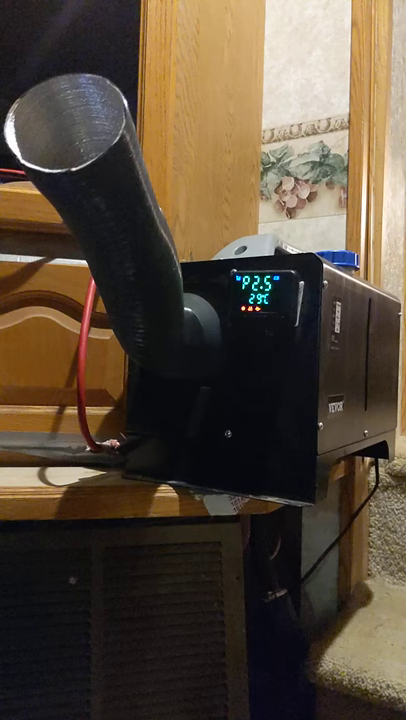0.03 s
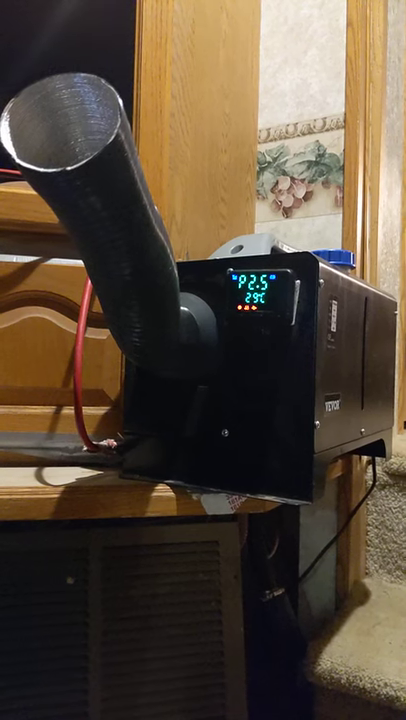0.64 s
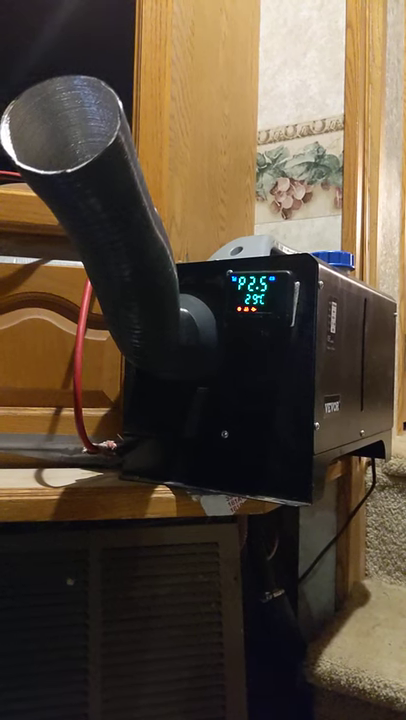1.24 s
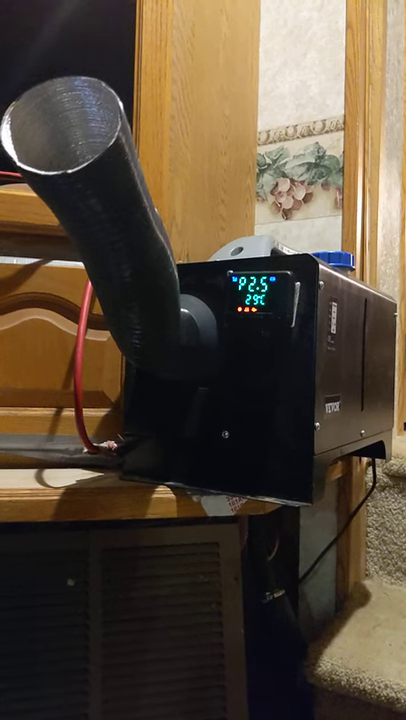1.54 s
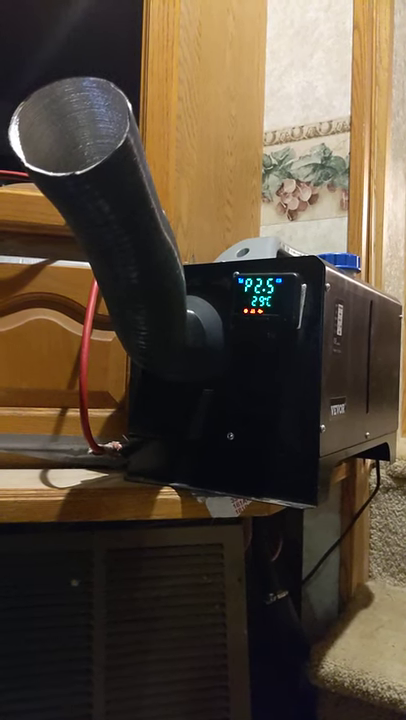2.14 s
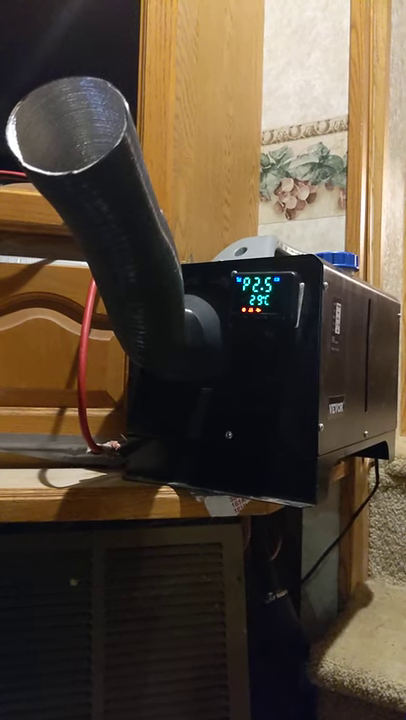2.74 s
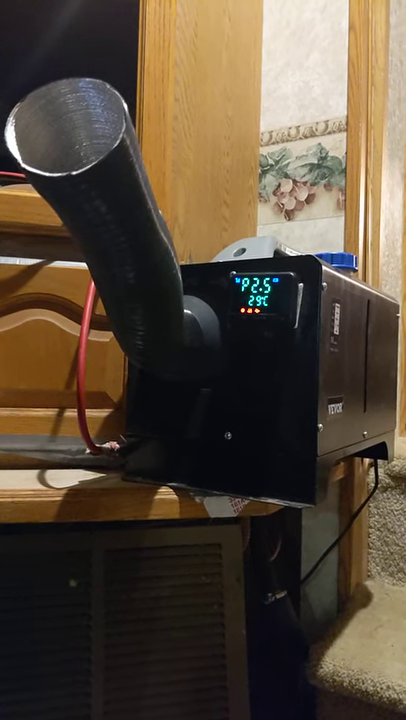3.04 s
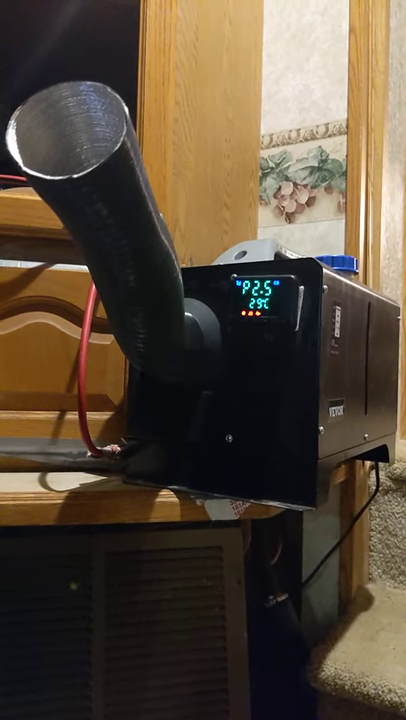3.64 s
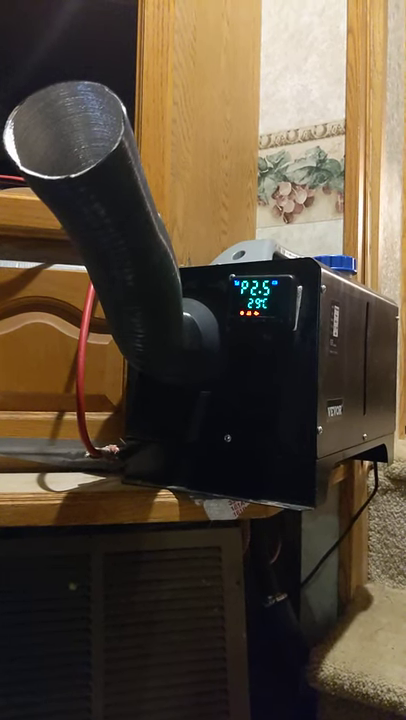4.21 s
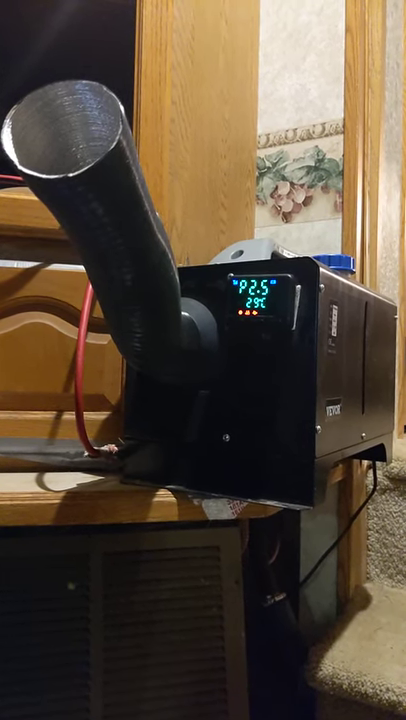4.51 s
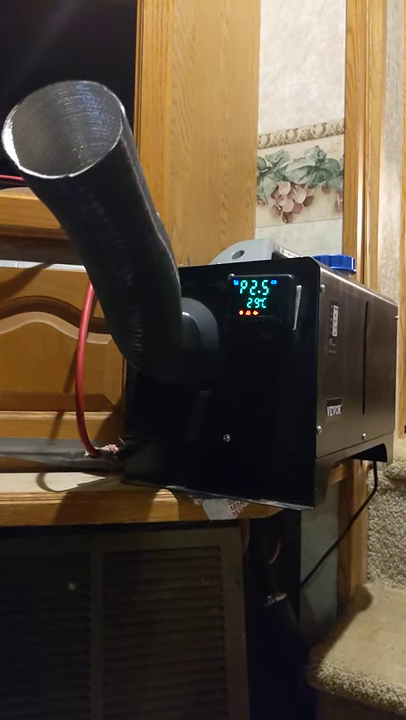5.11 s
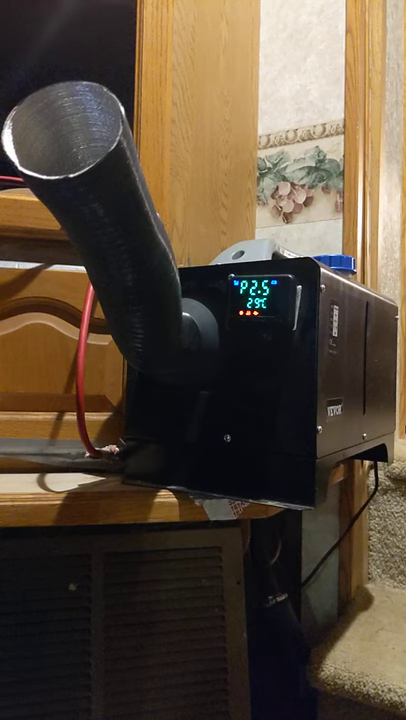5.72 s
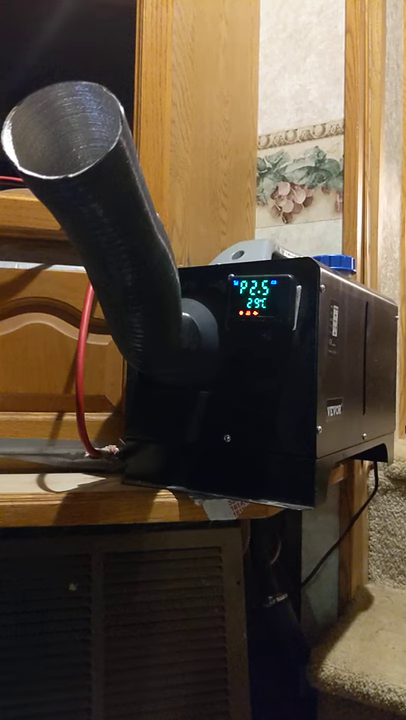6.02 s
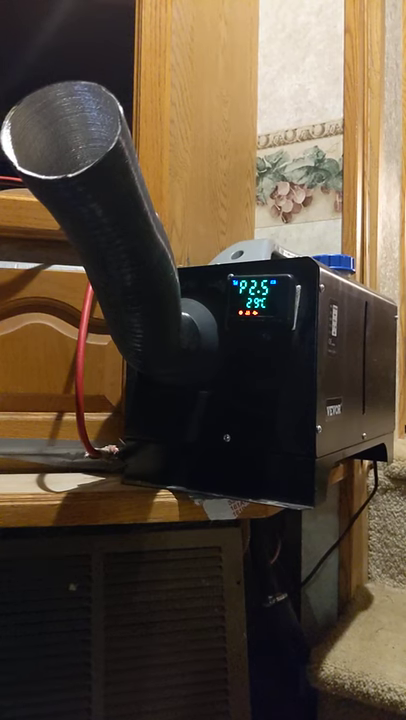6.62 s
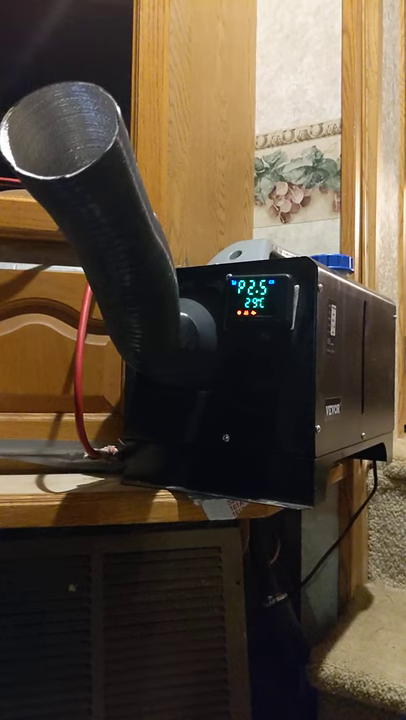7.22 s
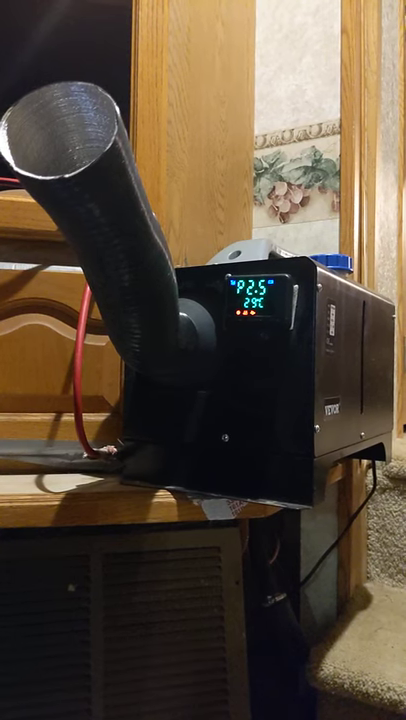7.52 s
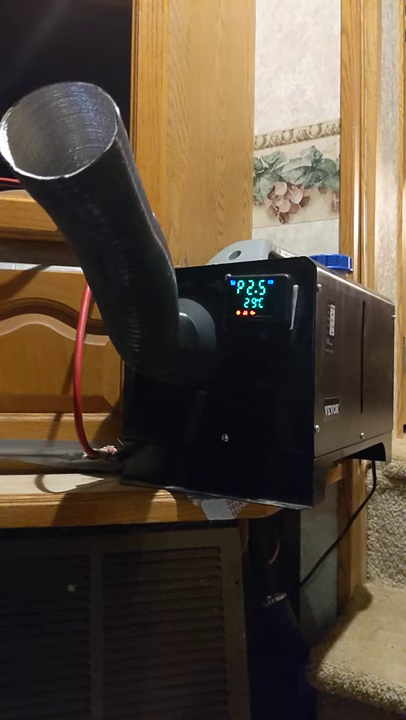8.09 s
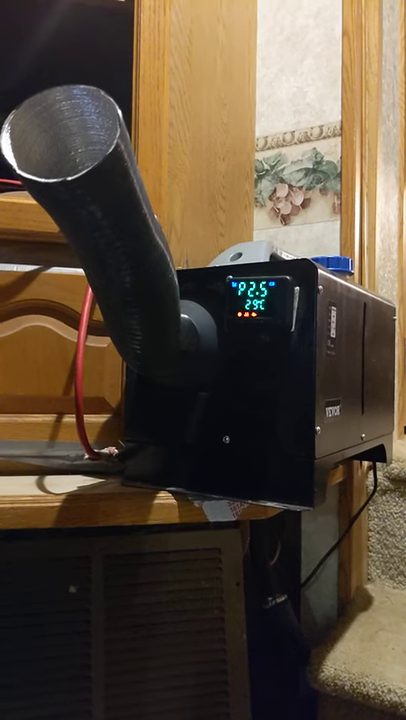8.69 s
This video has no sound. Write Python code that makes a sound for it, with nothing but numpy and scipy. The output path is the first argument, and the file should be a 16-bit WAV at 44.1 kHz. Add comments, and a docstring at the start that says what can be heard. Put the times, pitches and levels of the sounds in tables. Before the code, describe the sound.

Heard from close by in a small room, a heater's fuel pump knocks and clicks back in an even rhythm, roughly two pairs a second. Underneath, the burner's low rumble pulses with the pump, joined by a constant rush of air and an even fan hum. Now and then the flame gives a brief, soft thump, while the running stays otherwise unchanged.

```python
"""A low rumble and a rush of air: a diesel heater running on a shelf in a small wood-panelled room.
Its fan blows through a duct and hums on multiples of the shaft speed. One microphone stands in the
room, near enough to catch the fuel pump's plunger knocking in and clicking back about twice a second.
The burner's rumble surges with each stroke, and now and then the flame thumps."""
import sys
import numpy as np
from scipy.fft import rfft, irfft, next_fast_len
from scipy.io import wavfile
from scipy.ndimage import uniform_filter1d, map_coordinates

SR = 44100
rng = np.random.default_rng(int(sys.argv[2]) if len(sys.argv) > 2 else 0)


def store_wav(level_fs):
    """Save 16-bit WAV to argv[1]."""
    pcm = np.round(np.clip(np.atleast_2d(level_fs), -1, 1) * 32767)
    wavfile.write(sys.argv[1], SR, pcm.T.astype(np.int16))


N = 385875
FIRST_STROKE_S, STROKE_PERIOD_S = 0.6258, 0.4605  # the pump's beat, which the burner follows


def amp(db):
    return 10 ** (np.asarray(db) / 20)


def along(points, hz):
    """Read (Hz, value) points on a log frequency axis."""
    point_hz, values = np.transpose(points)
    return np.interp(np.log(hz + 1), np.log(point_hz + 1), values)


def curve(rows):
    """Join (seconds, value) rows into one value per sample."""
    return np.interp(np.arange(N) / SR, *np.transpose(rows))


def wobble(rate):
    """A smooth random curve with `rate` knots a second."""
    knots = rng.standard_normal(int(N * rate / SR) + 4)
    return map_coordinates(knots, [np.arange(N) * rate / SR])


def noise(gain, size):
    """Noise of rms 1, coloured by a gain over frequency."""
    padded = next_fast_len(size)
    spectrum = rfft(rng.standard_normal(padded)) * gain(np.fft.rfftfreq(padded, 1 / SR))
    coloured = irfft(spectrum, padded)[:size]
    return coloured / np.sqrt(np.mean(coloured ** 2) + 1e-20)


def add(track, start_s, sound):
    part = track[round(start_s * SR):][:len(sound)]
    part += sound[:len(part)]


# Broad spectrum of burner and air stream. Each row: frequency in Hz, relative level in dB.
FLOW_SPECTRUM = [(25, -37.5), (42, -28), (60, -7.5), (150, 1.5), (215, -10), (350, -7.5), (520, -22.5),
                 (850, -28.5), (1500, -32), (3000, -35.5), (4500, -47.5), (8000, -57), (14000, -52)]
# Resonances and cancellations of duct, case and room. Each row: centre in Hz, width in Hz, gain in dB.
DUCT_RESONANCES = [(66.8, 13, 7.5), (97, 8.4, -10.5), (191, 7.6, -8), (236, 11.2, 5), (296, 10.8, 3.5),
                   (378.4, 3.7, -5.5), (594.5, 50, 9), (636, 8.9, -10), (845, 65, 7.5), (1014, 9.7, -2.5),
                   (1037, 9, 4.5), (1120, 22, -3.5), (1173, 9.2, 5), (1257, 63, 9), (1340, 26, 9),
                   (1560, 21, 2.5), (1832, 8.5, 8.5), (2030, 93, -5.5), (2266, 7.9, 9.5), (2685, 25, -6.5),
                   (2800, 52, 2), (3380, 52, -8.5), (3520, 48, 3), (6170, 42, 1), (6800, 39, 7),
                   (8700, 280, 2.5), (10050, 160, -3.5), (11900, 114, 8), (12420, 80, 3), (12650, 100, 4.5),
                   (13600, 210, -8)]

def duct(hz):
    """Duct, case and room colour the flow on its way to the microphone."""
    resonance_db = sum(db * np.exp(-0.5 * ((hz - centre) / width) ** 2)
                       for centre, width, db in DUCT_RESONANCES)
    return amp(along(FLOW_SPECTRUM, hz) + resonance_db)


# The flame's rumble between pump strokes. Each row: time in seconds, relative level in dB.
FLAME_LEVELS = [(0.53, -43.5), (1.36, -47.5), (1.48, -45), (2.32, -46.5), (2.44, -42.5), (2.67, -48.5),
                (2.91, -43.5), (3.15, -46.5), (3.51, -44), (4.22, -45.7), (4.46, -48), (4.58, -44),
                (6.01, -45), (6.25, -43.1), (6.49, -47), (7.08, -42.3), (7.2, -47), (8.75, -44.1)]

def burner(gain_db=-0.5, edge_hz=195, flicker_db=0.88, surge_db=5.5, rise_s=0.013, fall_s=0.11):
    """The flame rumbles in the lowest resonances, surges after each pump stroke and flickers."""
    roar = noise(lambda hz: duct(hz) / np.sqrt(1 + (hz / edge_hz) ** 20), size=N)
    even_roar = roar / np.sqrt(np.abs(uniform_filter1d(roar ** 2, size=SR // 6)))
    since_stroke = (np.arange(N) / SR - FIRST_STROKE_S) % STROKE_PERIOD_S
    surge = (1 - np.exp(-(since_stroke / rise_s) ** 2)) * np.exp(-since_stroke / fall_s)
    level_db = curve(FLAME_LEVELS) + gain_db + surge_db * surge + flicker_db * wobble(rate=14)
    return amp(level_db) * even_roar


def air(level_db=-46.5, edge_hz=195, flutter_db=0.5):
    """Air blown into the room rushes above the rumble, fluttering a little."""
    stream = noise(lambda hz: duct(hz) / np.sqrt(1 + (edge_hz / (hz + 1)) ** 20), size=N)
    return amp(level_db + flutter_db * wobble(rate=12)) * stream


# The fan motor. Each row: time in seconds, speed in turns per second.
SHAFT_SPEED = [(0.7, 40.66), (2.2, 40.67), (2.9, 40.79), (4.2, 40.86), (5.0, 40.79), (5.9, 40.7),
               (7.2, 40.74), (7.9, 40.78), (8.45, 40.88)]
# The fan's hum. Each row: multiple of the shaft speed, relative level in dB.
FAN_ORDERS = [(19, -81.5), (20, -63.3), (21, -60.5), (22, -77.5), (23, -80), (24, -84), (26, -81.5),
              (31, -78.5), (32, -69.3), (33, -70), (34, -78.6), (38, -84), (45, -86), (55, -87)]

def fan(gain_db=4):
    """Neighbouring shaft orders beat once a turn; turbulence makes each waver slightly."""
    shaft_angle = 2 * np.pi * np.cumsum(curve(SHAFT_SPEED)) / SR
    hum = np.zeros(N)
    for order, db in FAN_ORDERS:
        phase = order * shaft_angle + rng.uniform(0, 2 * np.pi) + 0.06 * wobble(rate=14)
        hum += amp(db + 0.42 * wobble(rate=7)) * np.sqrt(2) * np.sin(phase)
    return amp(gain_db) * hum


def ticks(t, count, spectrum, attack_s, t60, room_t60, alike, room_db=-11):
    """Metal ticks with a short room tail; the share `alike` of their power is the same each time."""
    def dense_ring():
        return noise(lambda hz: amp(along(spectrum, hz)), size=len(t))
    decay = np.hypot(amp(-60 * t / t60), amp(room_db - 60 * t / room_t60))
    envelope = (1 - np.exp(-t / attack_s)) * decay
    common = np.sqrt(alike) * dense_ring()
    return [envelope * (common + np.sqrt(1 - alike) * dense_ring()) for _ in range(count)]


def ringing(t, modes, rise_s, scatter_db):
    """A body takes up a blow over the rise time and rings, each mode at a new strength."""
    ring = sum(amp(db + scatter_db * rng.standard_normal() - 60 * t / t60) * np.sin(2 * np.pi * hz * t)
               for hz, db, t60 in modes)
    return ring * (1 - np.exp(-(t / rise_s) ** 2))


# The plunger hitting its front and back stops. Each row: frequency in Hz, relative level in dB.
FRONT_STOP = [(300, -23), (900, -8), (2200, 1), (3300, 6), (4500, -3), (6200, 0.5), (8000, -5), (10000, -9),
              (14000, -11)]
BACK_STOP = [(300, -20), (900, -2), (2200, 3), (3300, -5), (4500, 4.5), (6200, 8), (8000, 0.5),
             (10000, -2.5), (14000, -4)]
# Modes of the pump's steel body, then of its bracket and the heater case.
# Each row: frequency in Hz, relative level in dB, seconds to fall by 60 dB.
STEEL_MODES = [(3103, 8, 0.048), (3520, 3.5, .07), (3980, -4, 0.084), (4040, -2, 0.12), (4360, -5, 0.09),
               (5330, 2, 0.06), (5490, -11, .08), (6140, 2.5, 0.07), (6800, 0, 0.091), (7140, -0.5, 0.049),
               (7800, -5, .06), (9700, -13, .05), (10650, -9, .05)]
CASE_MODES = [(233.6, -7.5, 0.21), (363.4, -5.5, 0.13), (405.6, -0.5, 0.14), (430, 6, 0.059),
              (535.5, -10, 0.18), (581, -10, .16), (687, -7.5, 0.1), (1048, -7.5, 0.042),
              (1548, -13, 0.062), (1774, -14.5, 0.067)]

def pump(pull_db=-52.5, release_db=-58.2, spread_db=1.2, knock_db=-37, rebound_db=-50,
         return_s=0.0535, case_lag_s=0.002526):
    """The solenoid pulls the plunger in, its spring throws it back more softly; the case answers both."""
    track = np.zeros(N)
    t = np.arange(SR // 4) / SR
    strokes = np.arange(FIRST_STROKE_S, N / SR, STROKE_PERIOD_S)
    pulls = ticks(t, len(strokes), FRONT_STOP, attack_s=0.00072, t60=0.047, room_t60=0.18, alike=0.44)
    releases = ticks(t, len(strokes), BACK_STOP, attack_s=0.00081, t60=0.057, room_t60=0.17, alike=0.39)

    def hit_stop(start_s, tick, tick_db, case_db, case_rise_s):
        strength = amp(rng.normal(tick_db, spread_db))
        steel = amp(-14) * ringing(t, STEEL_MODES, rise_s=0.0013, scatter_db=3)
        case = amp(case_db) * ringing(t, CASE_MODES, case_rise_s, scatter_db=2)
        add(track, start_s, strength * (tick + steel))
        add(track, start_s + case_lag_s, case)

    for start_s, pull, release in zip(strokes, pulls, releases):
        hit_stop(start_s, pull, pull_db, knock_db, case_rise_s=0.0057)
        hit_stop(start_s + return_s, release, release_db, rebound_db, case_rise_s=0.0016)
    return track


# Flares of the flame. Each row: centre time in seconds, level in dB, pitch in Hz.
FLARES = [(2.505, -32, 104), (5.724, -28, 85), (6.982, -30.5, 94)]

def flame_thumps(width_s=0.005):
    """Each flare gives the air one short, low push and pull."""
    t = np.arange(N) / SR
    track = np.zeros(N)
    for centre_s, db, hz in FLARES:
        envelope = np.exp(-0.5 * ((t - centre_s) / width_s) ** 2)
        track += amp(db) * envelope * np.sin(2 * np.pi * hz * (t - centre_s))
    return track


def scene():
    """The heater on its shelf, heard in mono from one spot in the room."""
    return (burner() + air() + fan() + pump() + flame_thumps())[None]


def record(dry):
    """The microphone opens after half a second of silence and keeps nothing above its band limit."""
    open_s, fade_s, top_hz = 0.508, 0.011, 14200
    opened = dry * np.clip((np.arange(N) / SR - open_s) / fade_s, 0, 1)
    padded = next_fast_len(N + SR // 2)
    in_band = np.fft.rfftfreq(padded, 1 / SR) < top_hz
    return irfft(rfft(opened, padded) * in_band, padded)[:, :N]


dry = scene()
out = record(dry)
store_wav(out)
```